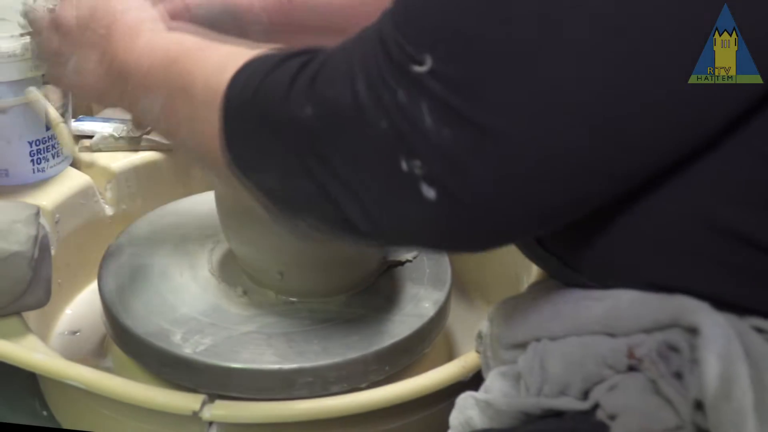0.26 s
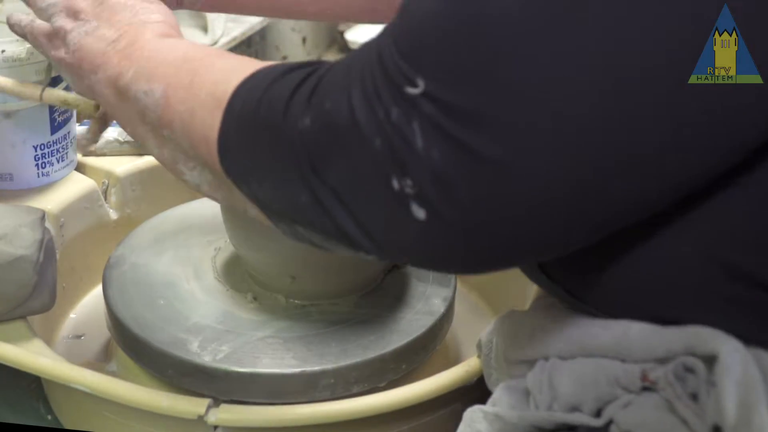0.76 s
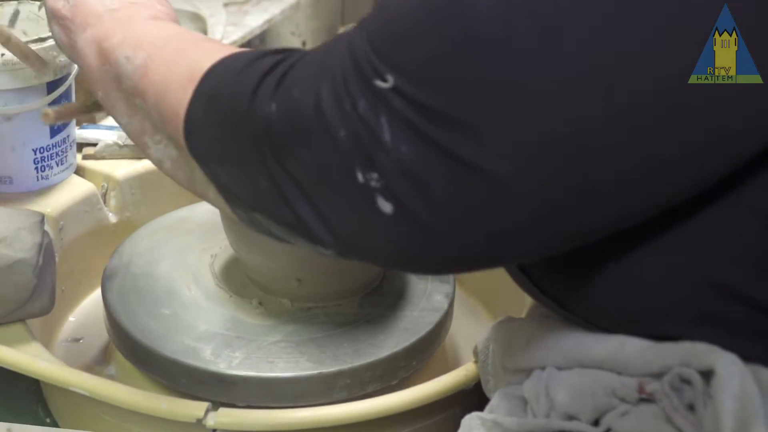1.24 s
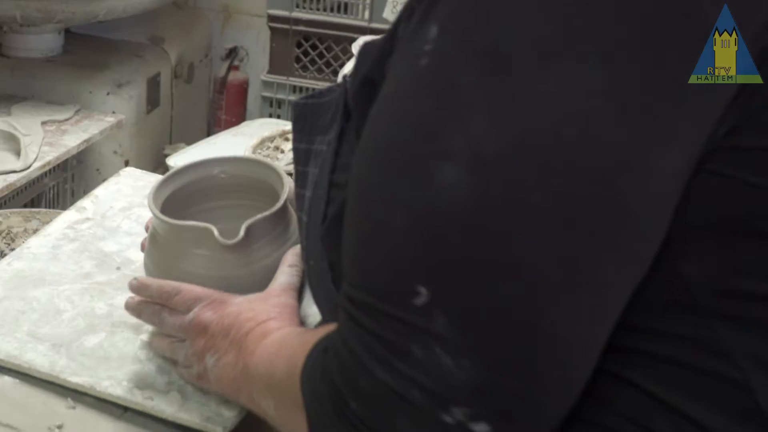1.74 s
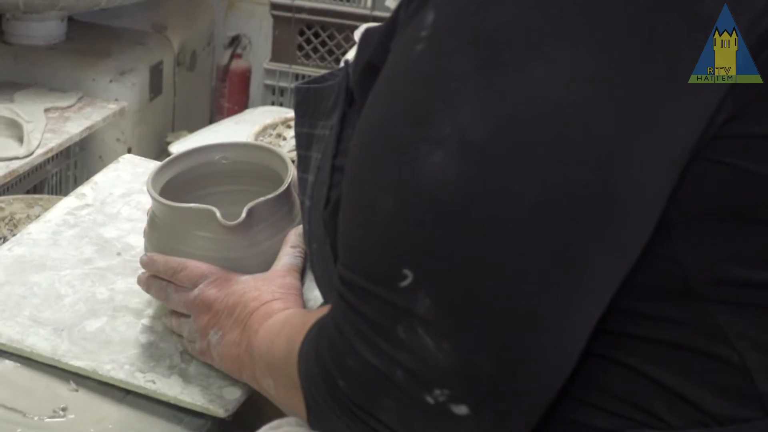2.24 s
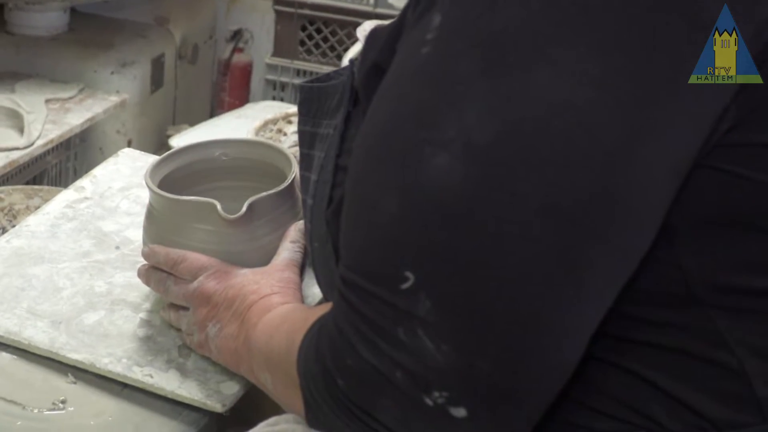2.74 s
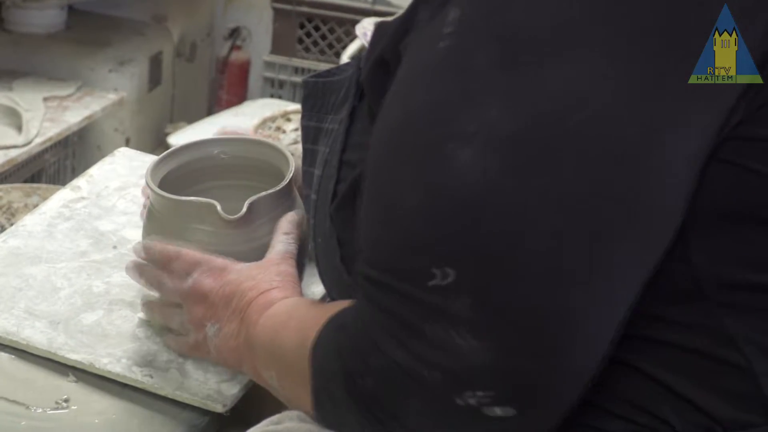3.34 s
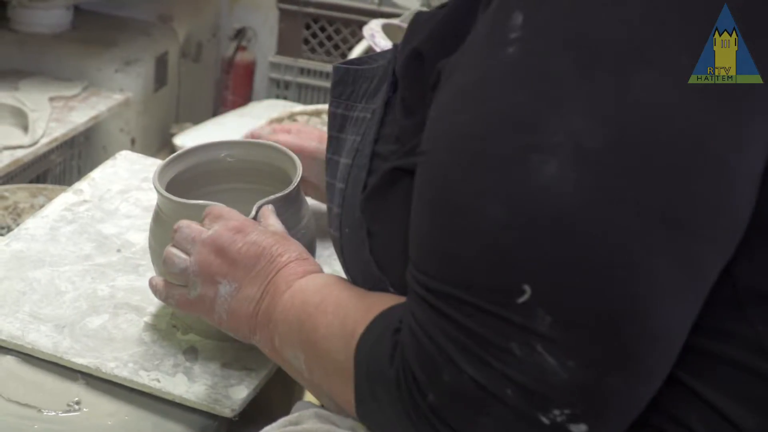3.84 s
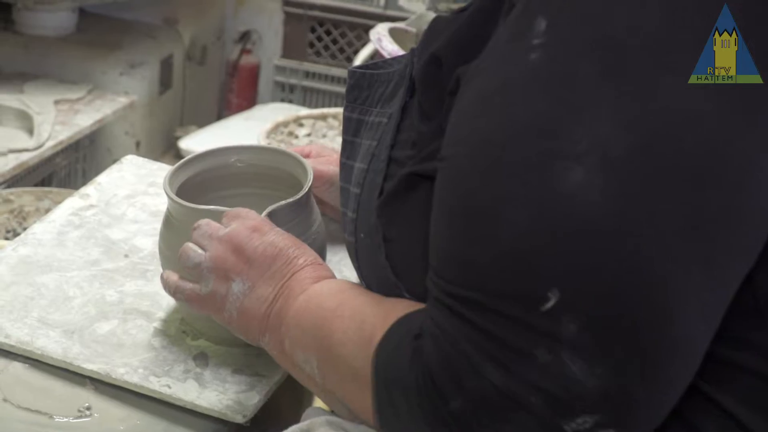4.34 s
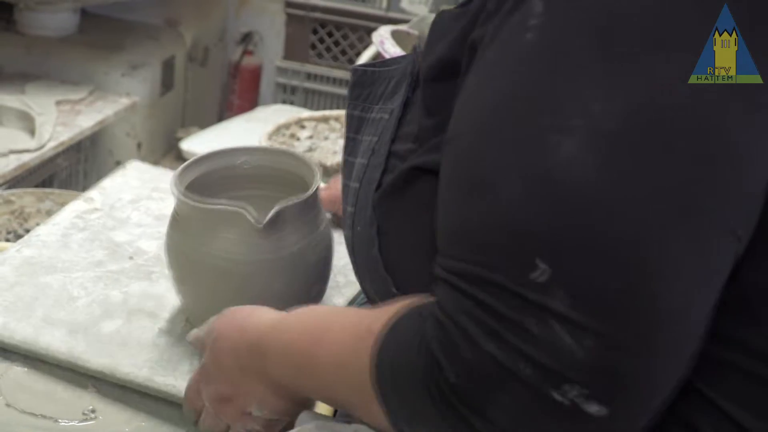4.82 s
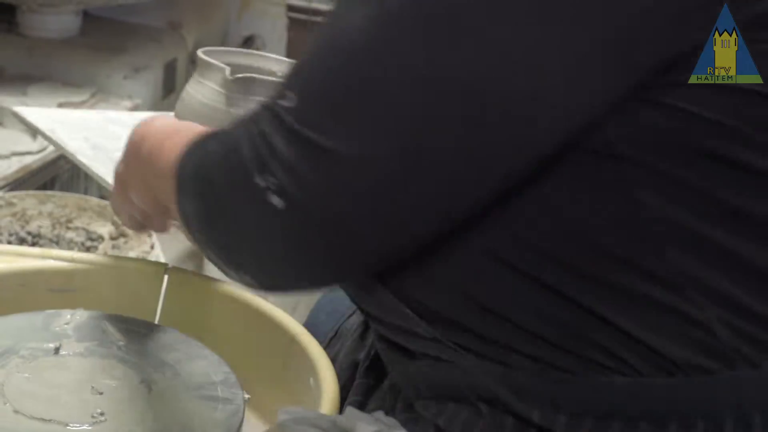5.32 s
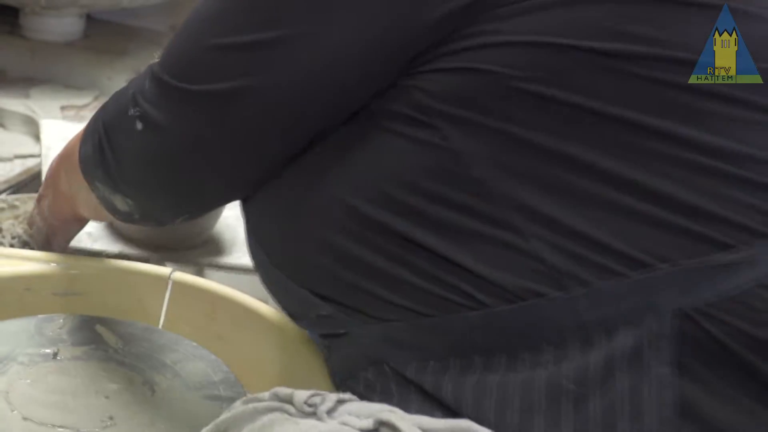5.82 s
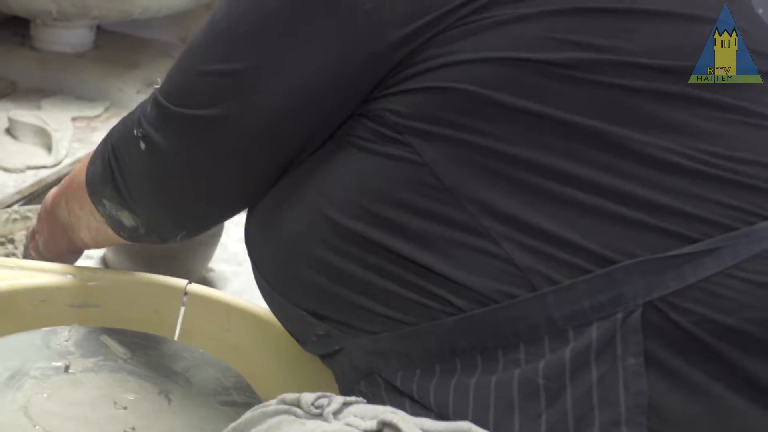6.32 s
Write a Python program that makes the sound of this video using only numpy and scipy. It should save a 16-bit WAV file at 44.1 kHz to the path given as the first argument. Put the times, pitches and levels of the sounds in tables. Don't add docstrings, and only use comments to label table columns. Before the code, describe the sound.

Steady mid-pitched motor whine with airy whirr, quiet clay thuds and wet smears, then a board scuffs, tools clink and wood knocks down loudly.

```python
import sys
import numpy as np
from scipy import signal
from scipy.fft import rfft, irfft, next_fast_len
from scipy.io import wavfile
from scipy.ndimage import uniform_filter1d

SR = 44100
rng = np.random.default_rng(int(sys.argv[2]) if len(sys.argv) > 2 else 0)


def nominal_scale(level):
    x = np.asarray(level, float) / 20
    return 10 ** x


def to_wav(sig):
    pcm = np.clip(np.atleast_2d(sig), -1, 1) * 32767
    pcm = np.round(pcm).astype(np.int16)
    wavfile.write(sys.argv[1], SR, pcm.T)


N = 289591
TIME = np.arange(N) / SR
PADDED = next_fast_len(N + SR)
# (frequency [Hz], left minus right [dB])
LEFT_DB = [(60, 2.4), (550, 2.8), (2000, 2.7), (5000, 2.5), (15000, 0)]


def in_time(rows):
    s, *columns = np.transpose(rows)
    return [np.interp(TIME, s, c) for c in columns]


def at_hz(points, hz):
    points_hz, values = np.transpose(points)
    return np.interp(np.log(hz + 1), np.log(points_hz), values)


def drift(rate_hz):
    r = np.exp(-200 * np.pi * rate_hz / SR)
    slow = signal.lfilter([1], [1, -2 * r, r * r], rng.standard_normal(N // 100 + 2002))[2000:]
    return np.interp(np.arange(N) / 100, np.arange(len(slow)), slow / slow.std())


def tone(hz, wobble_rad=0):
    return np.sqrt(2) * np.sin(2 * np.pi * (hz * TIME + rng.random()) + wobble_rad)


def spell(start_s, end_s, edge_s):
    return np.clip(np.minimum(TIME - start_s, end_s - TIME) / (3 * edge_s) + .5, 0, 1)


def motor_lines(swell_db, casing_db):
    shaft_hz, belt_hz, belt_depth = 25.008, 10.2, 0.19
    faint_order_db, dip_s = -78, 1.44
    strong_orders = (24, 22, 25, 73)
    low_orders = (4, 5, 10, 12)
    # (multiple of shaft rate, level [dB rms])
    orders_db = [(6, -69.5), (8, -65), (13, -59), (14, -69.5), (16, -66), (18, -66), (19, -64), (20, -64),
                 (21, -58), (17, -65), (26, -59.5), (27, -61), (28, -69), (29, -73), (30, -74), (31, -71),
                 (33, -63), (34, -65.5), (37, -66), (55, -63.5), (57, -64.5), (58, -73), (59, -62.5),
                 (60, -68), (63, -67.5), (64, -62), (68, -75.5), (70, -67), (72, -67.5), (75, -64.5)]
    # (multiple of shaft rate, level re main order [dB])
    early_orders = [(26, -13), (28, -14.5), (29, -20), (30, -13)]
    # (time [s], level [dB rms], once-a-turn pulse re that [dB])
    song = [(0, -50, -16), (.6, -51, -30), (1.3, -61.5, -10), (1.64, -50, -5.5), (1.98, -52, 0),
            (2.32, -43.5, -10.5), (2.6, -46, -20), (2.9, -54.5, 1.5), (3.25, -45.5, -23), (3.55, -51, -8),
            (4.15, -42, -11.5), (4.55, -47.5, 0), (4.87, -43, -15.5), (5.2, -43.5, -11), (5.4, -48, -10.5),
            (5.92, -40, -30), (6.23, -44.5, -30), (6.42, -40.5, -11.5)]

    main, second, _, high = strong_orders
    main_db, pulse_db = in_time(song)
    riders_db = rider_db(swell_db)
    belt = 1 + belt_depth * tone(belt_hz, 0.79 * drift(0.087))

    turn = 2 * np.pi * shaft_hz * TIME + 3.37 + 0.61 * drift(1.0)
    carrier = main * 2 * np.pi * shaft_hz * TIME + 0.21 * drift(4.0)
    pair = np.sin(carrier + turn) + nominal_scale(-2.0) * np.sin(carrier - turn)
    out = np.sqrt(2) * (nominal_scale(main_db) * belt * np.sin(carrier) + nominal_scale(main_db + pulse_db) * pair)

    early = np.clip((dip_s - TIME) / .15, 0, 1)
    for k, db in early_orders:
        out += early * nominal_scale(main_db + db + 2.0 * drift(6.0)) * tone(k * shaft_hz, 0.56 * drift(5.2))

    out += nominal_scale(riders_db[second]) * tone(second * shaft_hz, 0.39 * drift(9.0))
    out += nominal_scale(riders_db[high]) * (0.59 + 0.21 * belt) * tone(high * shaft_hz, .5 * drift(1.0))
    for k in low_orders:
        out += nominal_scale(riders_db[k]) * tone(k * shaft_hz, 0.11 * drift(0.63))

    levels_db = dict(orders_db)
    for k in sorted(set(range(3, 76)) - {*strong_orders, *low_orders, 23}):
        follow_db = casing_db if 25 < k < 32 else swell_db
        level_db = levels_db.get(k, faint_order_db) - 1.5 + follow_db + 2.18 * drift(1.0) + shadow_db(k)
        out += nominal_scale(level_db) * tone(k * shaft_hz, (0.19 + 0.034 * k) * drift(1.5))
    return out


def rider_db(swell_db):
    # (multiple of shaft rate, level [dB rms], share of the swell [1], wander [dB])
    riders = [(22, -57.5, 1.3, 0), (73, -55.5, 1.52, -4), (4, -64.5, 0.68, 0.4), (5, -78.5, 0.72, 5),
              (10, -68, 0.3, -1), (12, -55, 0.85, 2.65)]
    levels_db = {}
    for k, db, share, wander_db in riders:
        k = round(k)
        levels_db[k] = db + share * swell_db + wander_db * drift(0.85) + shadow_db(k)
    return levels_db


def shadow_db(order):
    # (multiple of shaft rate, start [s], end [s], lift [dB])
    shadows = [(22, 0.12, 1.3, -23), (22, 3.03, 3.4, 8.5), (22, 3.9, 4.5, -5), (22, 4.5, 4.7, -8),
               (22, 5.13, 5.3, 7), (22, 5.6, 6.15, 10), (22, 6.15, 6.4, 5), (73, 3.15, 2.8, 4),
               (73, 3.75, 4.3, -9), (73, 5.48, 5.97, 6), (4, 2.24, 3.28, 5), (4, 3.35, 3.61, -16.5),
               (13, .2, 0.95, -8), (13, 4.0, 5.3, 5), (21, 0.15, 1.2, -10), (21, 5.4, 6.2, 3),
               (20, 5.3, 5.5, 6), (19, 5.2, 7.5, 10), (18, 5.3, 7.7, 3.5), (55, 3.4, 5.2, 0),
               (59, 3.9, 2.2, -13), (58, 2.84, 3.6, 17), (64, 1.3, 5.7, -2), (5, 3.6, 4.094, 8),
               (10, 0.22, 1.2, -19), (10, 2.62, 4.05, 8), (10, 5.38, 5.73, 7), (12, 1.6, 1.6, -1),
               (12, 5.08, 4.84, -1.5)]
    return sum(lift_db * spell(a, b, 0.062) for k, a, b, lift_db in shadows if round(k) == order)


def motor_noise(curves_db):
    # (frequency [Hz], level [dB per Hz])
    whirr = [(20, -83), (55, -83.5), (90, -95), (200, -89.5), (300, -81.5), (450, -82.5), (700, -83),
             (1000, -88), (1300, -93), (1500, -86.5), (2000, -88.5), (3300, -94), (5000, -93.5),
             (15000, -112)]
    # (centre [Hz], width [Hz], lift [dB])
    casing = [(39.3, 9.9, 14), (613, 42, 17), (848, 49, 4), (1347.6, 7.5, 22.5), (1397, 120, 6),
              (1826, 44, 14), (2105, 10.7, 13.5), (2230, 63, 8), (2472, 46, 5.5), (2932, 48, 8),
              (3806, 17, 11.5), (4054, 15, 13), (4816, 27, 10), (5100, 440, -1), (8130, 250, 6.5)]
    # (frequency [Hz], left-right likeness [1])
    likeness = [(60, 1.0), (180, 1), (550, 1), (1650, 1), (4970, 0.94), (15000, 0.32)]
    # (frequency [Hz], level [dB per Hz])
    hiss_spectrum = [(3000, -114), (7000, -110), (10000, -108), (13000, -109), (15700, -111)]

    hz = np.arange(N // 2 + 1) * SR / N
    lift_db = sum(db / (1 + (2 * (hz - centre) / width) ** 2) for centre, width, db in casing)
    alike = np.clip(at_hz(likeness, hz), 0, 1)
    mid, side = rfft(rng.standard_normal((2, N))) * np.sqrt(SR / 4)
    pair = np.sqrt(1 + alike) * mid + np.sqrt(1 - alike) * side * [[1], [-1]]
    pair *= nominal_scale(at_hz(whirr, hz) + lift_db + at_hz(LEFT_DB, hz) / 2 * [[1], [-1]])

    hiss = rfft(rng.standard_normal((2, N))) * np.sqrt(SR / 2) * nominal_scale(at_hz(hiss_spectrum, hz))
    hiss = hiss * nominal_scale([[-4.0], [3.0]])

    under_150 = 1 / (1 + (hz / 150) ** 4)
    under_1300 = 1 / (1 + (hz / 1300) ** 8)
    parts = pair * under_150, pair * (under_1300 - under_150), pair * (1 - under_1300), hiss
    out = 0
    for part, db in zip(parts, curves_db):
        out = out + nominal_scale(db - np.median(db) + 0.45 * drift(3.4)) * irfft(part, N)
    return out


def strike(blows, colour, t60_at_1k_s, damping, rise_s, rings=(), count=120):
    out, after_s = np.zeros(N), np.arange(SR // 5) / SR
    low_hz, high_hz = colour[0][0], min(colour[-1][0], 15600)
    no_bass = signal.butter(4, 150, "high", fs=SR, output="sos")
    for s, peak_db in blows:
        place, turn, strength = rng.random((3, count, 1))
        hz = low_hz * (high_hz / low_hz) ** ((np.arange(count)[:, None] + place) / count)
        t60_s = t60_at_1k_s * (1000 / hz) ** damping * (0.46 + 0.25 * strength)
        rise = 1 - np.exp(-after_s / (rise_s * 1000 / hz))
        modes = nominal_scale(at_hz(colour, hz)) * np.sqrt(hz) * rise * nominal_scale(-60 * after_s / t60_s)
        blow = (modes * np.sin(2 * np.pi * (hz * after_s + turn))).sum(0)
        blow /= np.abs(blow).max()
        ring_rise = 1 - np.exp(-(after_s / rise_s) ** 2)
        for ring_hz, db, ring_t60_s in rings:
            decay = nominal_scale(db + rng.normal(0, 2.46) - 60 * after_s / ring_t60_s)
            blow += decay * np.sin(2 * np.pi * ring_hz * after_s) * ring_rise
        blow = signal.sosfilt(no_bass, blow)
        at = round(s * SR)
        out[at:at + len(after_s)] += nominal_scale(peak_db) * blow[:N - at]
    return out


def board_knock():
    # (time [s], peak [dB])
    hits = [
        (6.5187, -4),
        (6.5238, -9),
    ]
    # (frequency [Hz], level [dB per Hz])
    modes = [(65, -57), (110, -44), (206, -5.5), (508, -7), (647, 5), (1050, -6.5), (1470, -4),
             (2070, -13.5), (2600, -17), (3200, -17), (5000, -37), (7000, -54), (9100, -82), (15400, -120)]
    # (frequency [Hz], level [dB], t60 [s])
    rings = [(205, -23, 0.1), (240, -26, 0.18), (439, -8, 0.069), (536, -21, 0.13), (628, -9, 0.15),
             (755, -19.5, 0.1), (965, -21, 0.12), (1434, -16, 0.061)]
    return strike(hits, modes, 0.16, 0.25, 0.00073, rings)


def tap():
    # (time [s], peak [dB])
    hits = [
        (.0428, -12),
        (.0468, -19.5),
    ]
    # (frequency [Hz], level [dB per Hz])
    modes = [(120, -52), (200, -20), (280, -16), (461, 0.5), (1270, -2.5), (1520, 1.5), (1690, -1),
             (3320, -7), (6070, -20), (14000, -43)]
    return strike(hits, modes, 0.071, 0.62, 0.001)


def tool_ticks():
    # (time [s], peak [dB])
    hits = [
        (0.7968, -31.5),
        (0.84, -36.5),
        (0.872, -42),
    ]
    # (frequency [Hz], level [dB per Hz])
    modes = [(760, -38), (1300, -5), (2050, -1), (2970, -5), (4450, -2), (5110, 0), (9000, -42),
             (11700, -74), (19800, -120)]
    return strike(hits, modes, 0.059, 0.41, 0.0003)


def clay_thuds():
    # (time [s], peak [dB])
    hits = [(1.262, -39), (1.293, -33.5), (1.318, -53), (1.444, -27), (1.462, -30)]
    # (frequency [Hz], level [dB per Hz])
    modes = [(88, -45), (150, -16), (306, -15), (349, 1), (436, 0), (591, -8), (800, -6.5), (1140, -14),
             (3500, -34), (4550, -91), (7700, -120)]
    # (frequency [Hz], level [dB], t60 [s])
    rings = [(383, -17, 0.11), (416, -9, 0.13)]
    return strike(hits, modes, 0.11, 0.93, 0.00017, rings)


def board_scuff():
    # (time [s], peak [dB])
    hits = [(5.0761, -29.5)]
    # (frequency [Hz], level [dB per Hz])
    modes = [(900, -37), (1300, -9), (2350, -1), (5740, -4.5), (7230, -8), (7810, -7), (8660, -15),
             (15500, -20)]
    return strike(hits, modes, 0.26, 0.2, 0.0012, count=300)


def tool_clinks():
    # (time [s], peak [dB])
    hits = [(5.595, -42), (5.7812, -31), (5.8437, -32), (6.0621, -26.5)]
    # (frequency [Hz], level [dB per Hz])
    modes = [(470, -54), (800, 2), (3020, -0.5), (3410, -28), (4380, -5), (5310, -25), (6510, -8),
             (6990, -26), (8070, -19), (14000, -31)]
    # (frequency [Hz], level [dB], t60 [s])
    rings = [(6600, -20, 0.07), (7860, -18, 0.05), (9650, -25, 0.04)]
    return strike(hits, modes, 0.099, 0.11, 0.001, rings)


def earlier_ring():
    # (frequency [Hz], level [dB rms], t60 [s])
    partials = [(880, -40, 0.18), (1660, -41, 0.19), (3480, -52, 0.13)]
    return sum(nominal_scale(db - 60 * TIME / t60_s) * tone(hz) for hz, db, t60_s in partials)


def tray_ring():
    start_s, hz, level_db, t60_s = 1.33, 120, -61, 5.5
    decay = nominal_scale(level_db - 60 * (TIME - start_s) / t60_s)
    return decay * spell(start_s, start_s + 0.52, 0.05) * tone(hz)


def smears():
    # (time [s], length [s], level [dB rms], frequency just below the band's top [Hz])
    slides = [(.127, 0.011, -39, 3600), (0.14, 0.017, -46.5, 4400), (0.472, 0.015, -60, 6000),
              (4.539, 0.2, -51.5, 5700), (4.596, 0.067, -53, 5600), (3.8, 2.1, -63, 6400),
              (5.083, 0.04, -48, 3600), (5.47, 0.028, -51, 5600), (5.837, 0.04, -57, 9800),
              (6.6, 0.036, -61, 9200), (5.595, .04, -65, 8500), (5.09, 0.046, -55, 9300),
              (6.9, 0.056, -54, 8500), (2.3, .08, -66, 9000), (6.07, 0.06, -57, 2500)]
    out = np.zeros(N)
    for s, length_s, level_db, hz in slides:
        band = signal.butter(2, [hz / 3.6, hz * 1.1], "band", fs=SR, output="sos")
        grit = signal.sosfilt(band, rng.standard_normal(N) * nominal_scale(1.9 * drift(100)))
        share = np.clip((TIME - s) / length_s, 0, 9)
        out += nominal_scale(level_db) * grit / grit.std() * (1 - np.exp(-share * 12)) * np.exp(-share ** 3)
    return out


def ports(x):
    tilt_db = at_hz(LEFT_DB, np.arange(PADDED // 2 + 1) * SR / PADDED) / 2
    return irfft(rfft(x, PADDED) * nominal_scale(np.array([tilt_db, -tilt_db])), PADDED)[:, :N]


def studio(x):
    t60_s = 0.35
    after_s = np.arange(SR // 2) / SR
    tail = rng.standard_normal((2, len(after_s))) * nominal_scale(-60 * after_s / t60_s) * (after_s > .006)
    tail = 1.1 * tail[0] + 0.22 * tail
    tail = signal.sosfilt(signal.butter(1, [200, 3500], "band", fs=SR, output="sos"), tail)
    tail = tail / np.sqrt((tail ** 2).sum(1, keepdims=True))
    return signal.fftconvolve(x[None], tail, axes=1)[:, :N]


def electronics(swell_db):
    frame_hz, whine_hz, steady_hz, servo_hz = 25, 14400, 12937.6, 11000
    # (start [s], end [s], level [dB rms])
    bursts = [(0, .05, -74), (.5, .58, -80), (1.03, 1.52, -85), (2.64, 2.71, -71), (4.575, 4.645, -70)]
    chop = np.tanh(6 * np.sin(2 * np.pi * frame_hz * TIME))
    whines = nominal_scale(-76.5) * chop * tone(whine_hz) + nominal_scale(-81.5) * tone(steady_hz)
    gate = sum(nominal_scale(db) * (TIME > a) * (TIME < b) for a, b, db in bursts)
    servo = uniform_filter1d(gate, size=200) * tone(servo_hz)
    return whines * nominal_scale(swell_db) * nominal_scale([[-12], [5]]) + servo * nominal_scale([[-3], [2.5]])


def scene():
    # (time [s], level [dB])
    motor_fade = [(0, -61), (.15, -62.5), (.8, -69), (1.1, -72.5), (1.41, -73.5), (1.65, -66), (1.94, -61),
                  (2.2, -58.5), (2.4, -57.5), (3.3, -57.5), (4.3, -58), (5.9, -56.5), (6.2, -58.5),
                  (6.57, -57.5)]
    fade_db, = in_time(motor_fade)
    swell_db = fade_db - np.median(fade_db)

    casing_db = 0.7 * swell_db + 3.0 * spell(5.08, 6.18, 0.28) + 10.5 * np.exp(-TIME / .06)
    hiss_db = 0.82 * swell_db
    rumble_db = 0.59 * swell_db - spell(-1, 1.8, .1) + 2.6 * drift(1.04)

    blows = tap() + tool_ticks() + clay_thuds() + board_scuff() + tool_clinks() + board_knock()
    near = motor_lines(swell_db, casing_db) + blows + smears() + earlier_ring() + tray_ring()
    noise = motor_noise((rumble_db, casing_db, swell_db, hiss_db))
    return ports(near) + nominal_scale(-17) * studio(blows) + noise + electronics(hiss_db)


def band_limit(x):
    return signal.sosfilt(signal.butter(12, 15680, fs=SR, output="sos"), x)


def record(dry):
    top_cut = signal.cheby2(14, 60, 16150, fs=SR, output="sos")
    return band_limit(signal.sosfilt(top_cut, dry))


dry = scene()
out = record(dry)
to_wav(out)
```